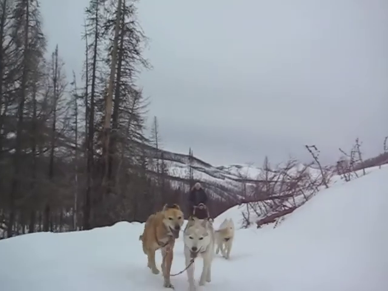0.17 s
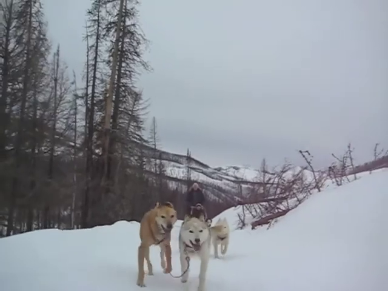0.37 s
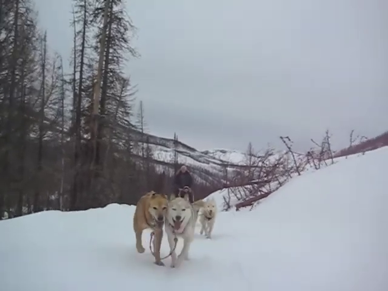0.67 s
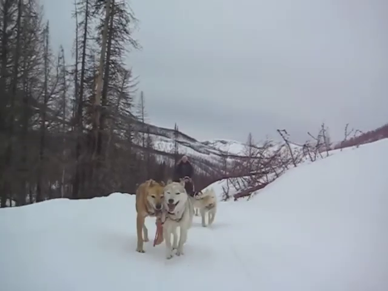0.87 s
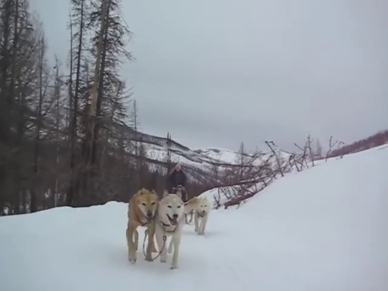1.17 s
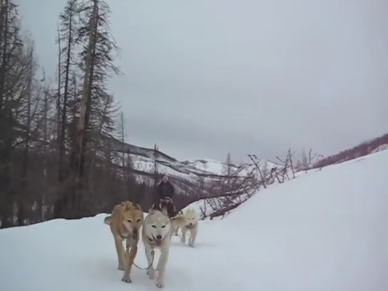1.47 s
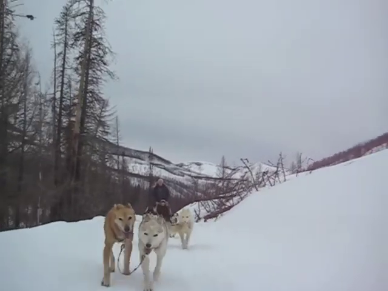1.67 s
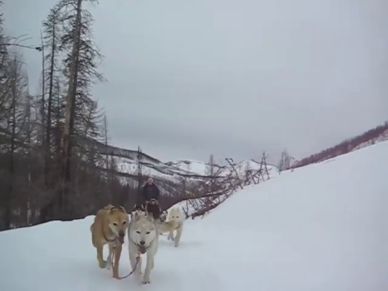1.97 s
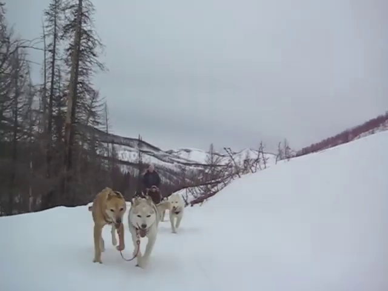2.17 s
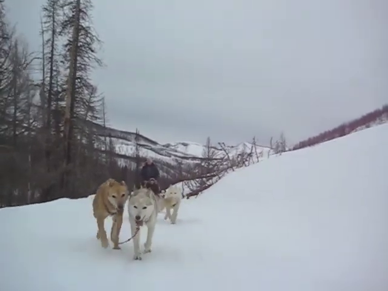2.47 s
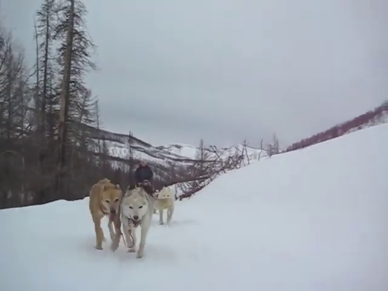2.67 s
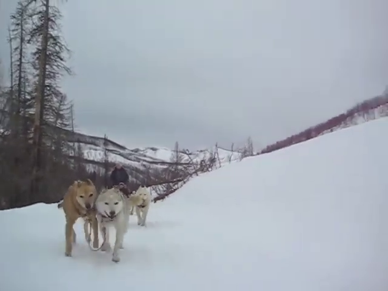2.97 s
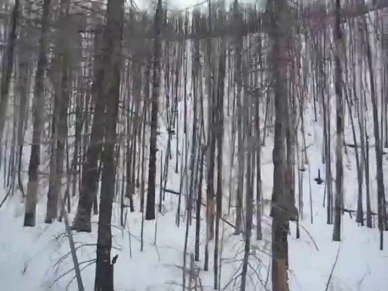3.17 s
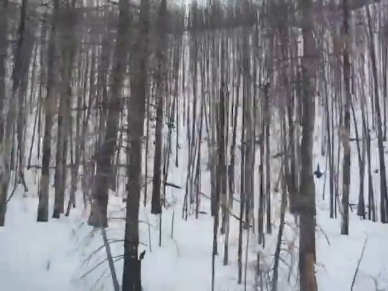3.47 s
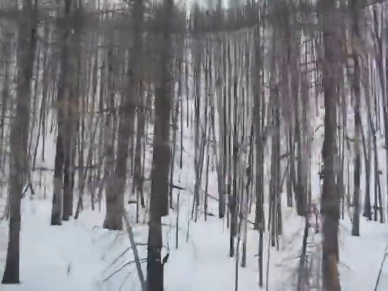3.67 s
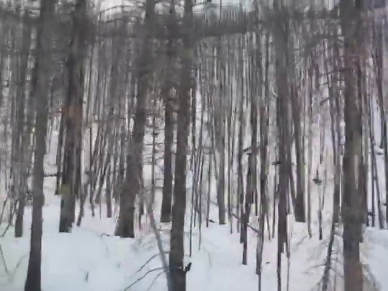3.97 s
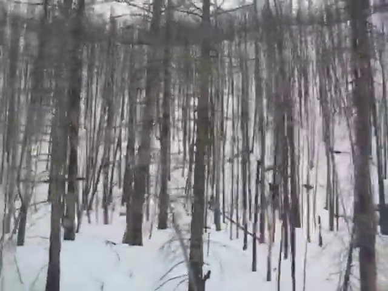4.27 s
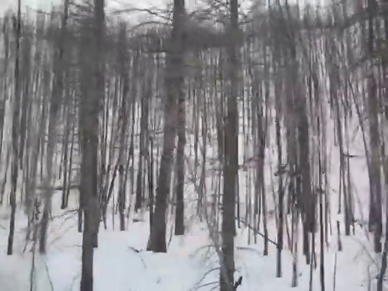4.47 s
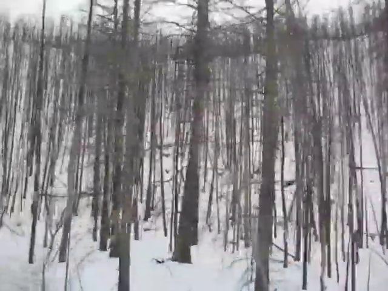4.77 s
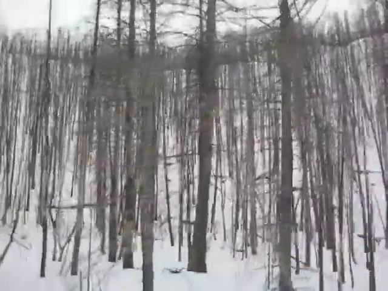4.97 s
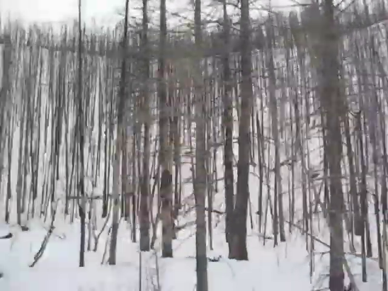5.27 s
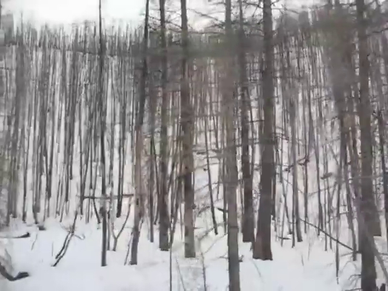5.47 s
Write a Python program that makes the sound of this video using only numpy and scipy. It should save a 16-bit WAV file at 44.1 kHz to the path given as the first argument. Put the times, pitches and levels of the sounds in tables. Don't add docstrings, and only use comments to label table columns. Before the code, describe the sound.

Steady crisp hiss of a gliding dog sled, briefly fading, then harsh buffeting wind that nearly buries the duller scrape of runners.

```python
import sys
import numpy as np
from scipy import signal
from scipy.fft import rfft, irfft, next_fast_len
from scipy.io import wavfile
from scipy.ndimage import uniform_filter1d, map_coordinates

SR = 44100
rng = np.random.default_rng(int(sys.argv[2]) if len(sys.argv) > 2 else 0)


def unload_audio(sound):
    columns = np.transpose(np.atleast_2d(sound))
    steps = np.round(np.clip(columns, -1, 1) * 32767)
    wavfile.write(sys.argv[1], SR, steps.astype(np.int16))


def gain_from_db(level_db):
    decades = np.asarray(level_db, float) / 20
    return 10 ** decades


N = 247401
CUT_S = 3.067

# time_s, edge_db
LEE_PACE = [
    (0.05, -26),
    (0.5, -24.5),
    (1.0, -25),
    (1.5, -24.5),
    (2.0, -24),
    (2.45, -22.5),
    (2.9, -23),
]
# pitch_hz, level_db (per Hz)
LEE_GLIDE_TONE = [(290, -33), (500, -11), (915, -2.5), (1170, -1.5), (2020, -3), (2900, -2), (3490, -3.5),
                  (4590, -3.5), (8280, -8), (13300, -22.5), (15600, -31)]
# middle_s, level_db, half_length_ms
PAWS = [(.05, -49, 25), (.19, -45, 25), (.24, -45, 20), (.37, -44, 25), (.47, -44, 20), (.65, -44, 30),
        (.79, -35, 9), (.85, -39, 22), (.93, -39, 20), (1.0, -34, 10), (1.09, -43, 15), (1.29, -41, 12),
        (1.5, -38, 12), (1.55, -43, 15), (1.67, -43, 12), (1.88, -37, 8), (1.97, -37, 22), (2.13, -43, 12),
        (2.18, -38, 25), (2.385, -39, 14), (2.42, -37, 18), (2.6, -37, 16), (2.66, -42, 20),
        (2.89, -39, 22), (3.02, -34, 22)]
# pitch_hz, level_db (per Hz)
POWDER_TONE = [(5000, -30), (8000, -11), (10500, 6), (13000, 0), (15700, -11)]
# pitch_hz, level_db (per Hz)
DRONE_TONE = [(15, -52), (25, -40), (189, -8.5), (226, -9), (325, -3.5), (480, -7), (700, -13.5),
              (910, -34), (1540, -120)]
# middle_s, peak_db, half_length_ms
JOLTS = [
    (.5575, -30, 1.1),
    (2.235, -37, 1.8),
    (2.395, -49, 2.2),
]
# time_s, sharpness_db
WIND_SPEED = [(3.1, -9), (3.27, -9), (3.4, -12.5), (3.69, -12), (3.84, -14.5), (3.97, -8.5), (4.1, -9.5),
              (4.35, -6), (4.45, -7), (4.67, -5.5), (4.98, -6.5), (5.1, -10.5), (5.25, -9), (5.35, -6),
              (5.58, -3.5)]
# middle_s, depth_db, half_length_ms
LULLS = [(3.183, -6.5, 8), (3.291, -5, 6.2), (3.487, -7, 8.6), (3.584, -6, 11.9), (3.649, -7.5, 10.8),
         (3.71, -4.5, 7.2), (3.752, -5.5, 11.2), (3.839, -8, 12.6), (3.873, -5.5, 5.9), (4.11, -5, 10.5),
         (4.227, -4.5, 8), (4.39, -5, 8.7), (4.454, -7, 17), (4.525, -6, 8.9), (4.595, -4.5, 6.05),
         (4.644, -5, 7.87), (4.926, -4.5, 8.5), (5.035, -6.5, 19.4), (5.112, -5, 7.6), (5.177, -7, 12.7),
         (5.24, -8, 20.2), (5.546, -5.5, 9.9)]
# pitch_hz, level_db (per Hz)
EDDY_TONE = [(40, -34), (100, -13.5), (250, -2), (500, -1.5), (900, -4), (1500, -14), (2500, -28),
             (5000, -90)]
# pitch_hz, level_db (per Hz)
RUMBLE_TONE = [(10, -16), (30, -10.5), (80, 0.5), (150, -2), (300, -3), (600, -54)]
# middle_s, peak_db, cycle_ms
HARD_POPS = [(3.1752, -3.5, 1.8), (3.2, -9, 1.04), (3.228, -8, 1.1), (3.236, -2, 1.5), (3.3451, -11, 0.86),
             (3.4085, -9, 2.6), (3.44, -15, 1), (3.5139, -3, 1.03), (3.609, -3.5, 1.86),
             (3.7271, -3.5, 2.6), (4.027, -4, 1.04), (4.0468, -2, 2.5), (4.0796, -9, 1.5),
             (4.1841, -3.5, 1.13), (4.3102, -3.5, 1.2), (4.4286, -4, 0.98), (4.466, -9.5, 0.91),
             (4.5097, -1.3, 1.07), (4.537, -4.5, 1.51), (4.6759, -9, 0.6), (4.8897, -3.5, 1.02),
             (5.001, -2.5, 1.3), (5.099, -7.5, 1.19), (5.158, -0.5, 1.56), (5.2018, 0.5, 1.92),
             (5.2843, -2, 0.72), (5.349, -1.2, 1.23), (5.4723, -2.5, 1.55), (5.521, -2, 0.8),
             (5.6099, -6.5, 0.97)]
# time_s, load_db
OPEN_LOAD = [(3.1, -37), (3.19, -37), (3.38, -34.5), (3.71, -33.5), (3.78, -28.5), (4.03, -36), (4.09, -43),
             (4.16, -40.5), (4.53, -46), (4.78, -42), (4.9, -41.5), (5.02, -39), (5.12, -32.5),
             (5.26, -34.5), (5.54, -47), (5.6, -42)]
# pitch_hz, level_db (per Hz)
OPEN_GLIDE_TONE = [(500, -32), (1500, -5.5), (2600, -0.5), (3900, 0.5), (4500, -2), (5450, -5), (5900, 0),
                   (6600, -1.5), (8000, -6), (10000, -7.5), (12500, -18), (15700, -28)]
# pitch_hz, level_db (per Hz)
SPRAY_TONE = [(5000, -30), (8000, 2), (10000, -5), (12000, -5), (14000, -7), (15700, -22)]
# middle_s, level_db, half_length_ms
DRIFTS = [
    (3.67, -33, 13),
    (3.87, -34, 15),
    (3.93, -30, 11),
    (4.19, -42, 19),
    (4.29, -40, 25.3),
    (4.49, -39, 15),
    (4.58, -45, 35),
    (4.97, -39.5, 23),
    (5.2, -39, 18.5),
    (5.28, -35, 15),
]


def unit(x):
    return x / np.sqrt(np.mean(x ** 2) + 1e-20)


def curves(rows):
    s, *cols = np.transpose(rows)
    return [np.interp(np.arange(N) / SR, s, c) for c in cols]


def wobble(rate):
    return map_coordinates(rng.standard_normal(4000), [np.arange(N) * rate / SR])


def coloured(x, spectrum):
    size = next_fast_len(len(x) + 8192)
    f, db = np.transpose(spectrum)
    hz = np.fft.rfftfreq(size, 1 / SR)
    gain = gain_from_db(np.interp(np.log(hz + 1), np.log(f + 1), db))
    return unit(irfft(rfft(x, size) * gain, size)[:len(x)])


def patchy(patchy_db):
    z = signal.stft(rng.standard_normal(N), nperseg=512)[2]
    field = uniform_filter1d(rng.standard_normal(z.shape), size=8, axis=0)
    field = uniform_filter1d(field, size=8, axis=1)
    return signal.istft(z * gain_from_db(patchy_db * unit(field)), nperseg=512)[1][:N]


def crystals(spread_db):
    stand_db = spread_db * np.minimum(rng.exponential(size=N), 5)
    return unit(rng.standard_normal(N) * gain_from_db(stand_db))


def swells(rows):
    t = np.arange(N) / SR
    power = sum(gain_from_db(2 * db) * np.exp(-((t - s) * 1000 / ms) ** 2) for s, db, ms in rows)
    return np.sqrt(power)


def glide(glide_db, spectrum, crunch, rough_db):
    texture = gain_from_db(rough_db * (wobble(24.1) + 0.65 * wobble(70)))
    friction = patchy(patchy_db=0.52) + crunch * crystals(spread_db=4)
    return gain_from_db(glide_db) * texture * coloured(friction, spectrum)


def sheltered_runners():
    edge_db, = curves(LEE_PACE)
    body_db = -27.5 + 0.12 * (edge_db + 25.5)
    hiss = glide(body_db + 5, LEE_GLIDE_TONE, crunch=0.63, rough_db=0.61)
    edge_band = signal.butter(1, [2 * 3000 / SR, 2 * 8500 / SR], "band")
    edge = signal.lfilter(*edge_band, hiss)
    return hiss + (gain_from_db(0.85 * (edge_db - body_db - 2)) - 1) * edge


def frame_drone():
    return gain_from_db(-42.5) * coloured(patchy(patchy_db=0.9), DRONE_TONE)


def paw_spray():
    return swells(PAWS) * coloured(crystals(spread_db=0), POWDER_TONE)


def frame_jolts():
    push = swells(JOLTS)
    return gain_from_db(-0.5) * (uniform_filter1d(push, size=500) - push)


def lee():
    return sheltered_runners() + frame_drone() + paw_spray() + frame_jolts()


def buffeting(sharp_db, slack_db):
    flutter = 0.09 * wobble(70) + 0.3 * np.tanh(0.8 * wobble(380))
    speed = 2 ** np.clip((sharp_db + 5.5 + 0.6 * slack_db) / 9 + flutter, -3, 1.4)
    pattern = coloured(rng.standard_normal(2 * N), EDDY_TONE)
    passing = map_coordinates(pattern, [np.cumsum(speed)], order=3)
    passing = passing * 2 ** (2.03 * flutter) * gain_from_db(0.49 * wobble(110))
    held = np.abs(uniform_filter1d(passing ** 2, size=2600)) ** 0.5
    level_db = -17.3 + 0.043 * (sharp_db + 10.5) + 0.72 * slack_db
    return gain_from_db(level_db) * unit(passing / held)


def rumble():
    swing_db = 2.5 * wobble(9)
    return gain_from_db(-31.5 + swing_db) * coloured(patchy(patchy_db=1.6), RUMBLE_TONE)


def lesser_pops(pace, slack_db, count):
    blowing = np.arange(N) > (CUT_S + 0.07) * SR
    run = np.cumsum(pace * blowing)
    when, size, span = rng.uniform(size=(count, 3)).T
    i = np.searchsorted(run, run[-500] * (np.arange(count) + when) / count)
    db = -9.5 + 4.2 * (2 * size - 1) + 1.2 * slack_db[i]
    from_hard_s = i[:, None] / SR - np.transpose(HARD_POPS)[0]
    db -= 12 * np.exp(-(from_hard_s / 0.009) ** 2).sum(axis=1)
    cycle_ms = 1.05 / pace[i] ** 0.84 * 2 ** (0.45 * (2 * span - 1))
    return list(zip(i / SR, db, cycle_ms))


def pops(rows, cycles, steep=0.31):
    out, hollow, t = np.zeros(N), np.ones(N), np.arange(N) / SR
    turns = rng.uniform(0, 2 * np.pi, len(rows))
    for (s, db, ms), turn in zip(rows, turns):
        near = slice(int((s - 0.008) * SR), int((s + 0.008) * SR))
        u = (t[near] - s) * 1000 / ms
        swing = np.cos(2 * np.pi * u + turn)
        swing += steep * gain_from_db(db) * np.cos(4 * np.pi * u + 2 * turn)
        out[near] += gain_from_db(min(db, -1.5)) * np.exp(-(u / cycles) ** 2) * swing
        hollow[near] *= 1 - 0.8 * np.exp(-(u / 0.8) ** 2)
    return out, hollow


def wind():
    sharp_db, = curves(WIND_SPEED)
    t = np.arange(N) / SR
    slack_db = sum(db * np.exp(-((t - s) * 1000 / ms) ** 2) for s, db, ms in LULLS)
    pace = 2 ** ((sharp_db + 7) / 9)
    hard, hollow = pops(list(HARD_POPS) + lesser_pops(pace, slack_db, count=120), cycles=0.41)
    return buffeting(sharp_db, slack_db) * hollow + rumble() + gain_from_db(1.5) * hard


def exposed_runners():
    load_db, = curves(OPEN_LOAD)
    fine_snow = gain_from_db(load_db - 14) * coloured(crystals(spread_db=4), SPRAY_TONE)
    return glide(load_db + 3, OPEN_GLIDE_TONE, crunch=0.37, rough_db=1.04) + fine_snow


def drift_cuts():
    tone = [(1500, -30), (3500, -3), (8000, -2), (15700, -21)]
    return swells(DRIFTS) * coloured(crystals(spread_db=4), tone)


def scene():
    t = np.arange(N) / SR - CUT_S
    out = np.clip(-t / 0.11, 0, 1)
    back = np.clip(t / 0.097, 0, 1) ** 1.04
    mono = out * lee() + back * (wind() + exposed_runners() + drift_cuts())
    return np.array([mono, mono])


def parted(mono, count):
    frame, until_s = 2048, 2.9
    lowest_hz, highest_hz, width_hz = 4150, 14500, 1500
    side = np.zeros(N)
    hz = np.fft.rfftfreq(frame, 1 / SR)
    for k, (when, band) in enumerate(rng.uniform(size=(count, 2))):
        start = int((k + when) / count * until_s * SR)
        low = lowest_hz * (highest_hz / lowest_hz) ** ((band + k * 0.618) % 1)
        backwards = mono[start:start + frame][::-1]
        other = rfft(backwards) * ((hz > low) & (hz < low + width_hz))
        side[start:start + frame] += np.hanning(frame) ** 2 * irfft(other)
    return side


def band_limit(x):
    return signal.sosfilt(signal.butter(12, 15750, fs=SR, output="sos"), x)


def record(dry):
    soft = dry / (1 + np.abs(dry / 0.85) ** 3) ** (1 / 3)
    side = parted(soft[0], count=34)
    mix = soft + [side, -side]
    return band_limit(mix)


dry = scene()
out = record(dry)
unload_audio(out)
```